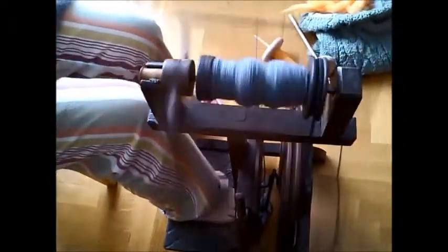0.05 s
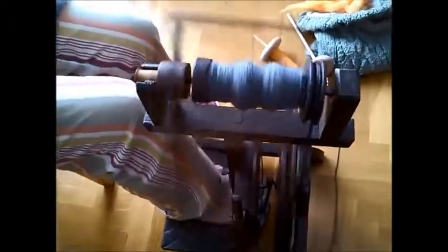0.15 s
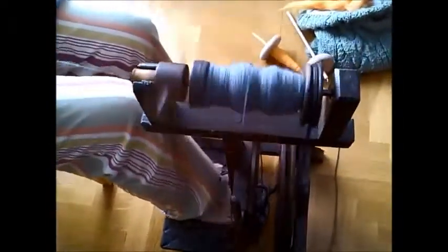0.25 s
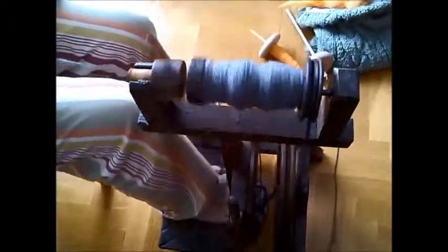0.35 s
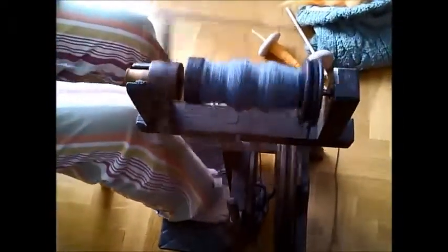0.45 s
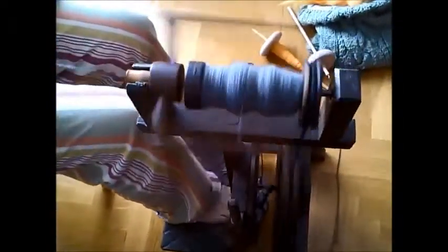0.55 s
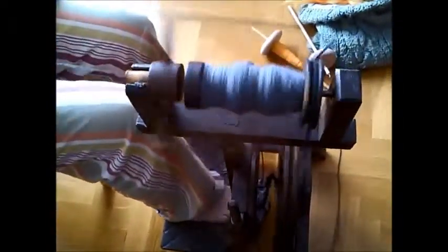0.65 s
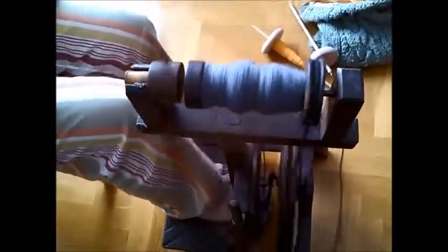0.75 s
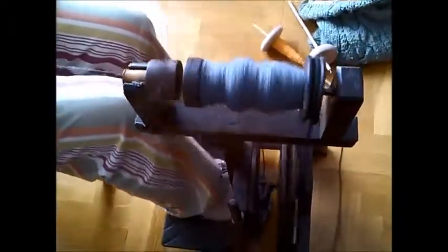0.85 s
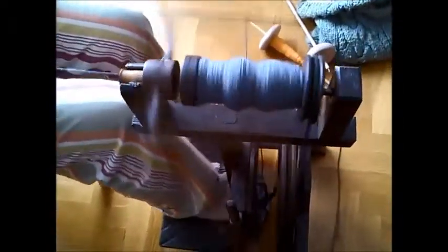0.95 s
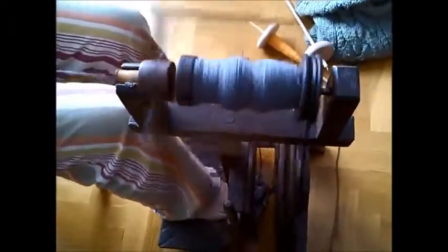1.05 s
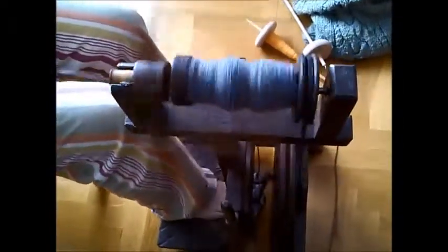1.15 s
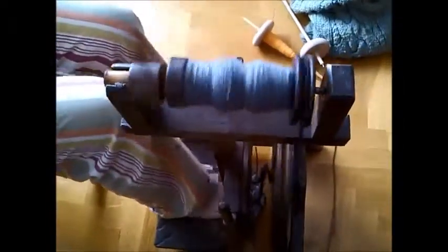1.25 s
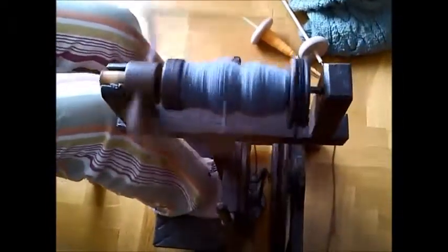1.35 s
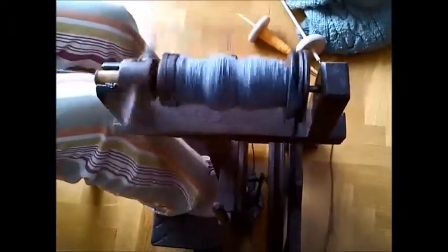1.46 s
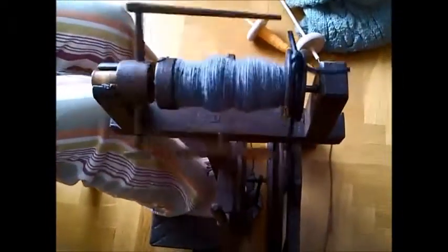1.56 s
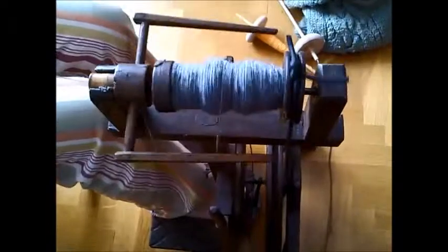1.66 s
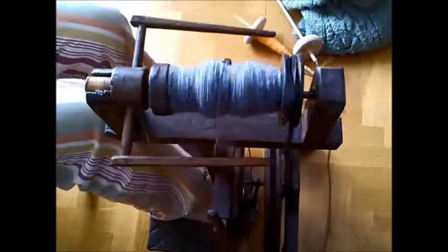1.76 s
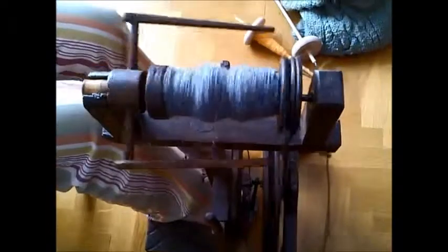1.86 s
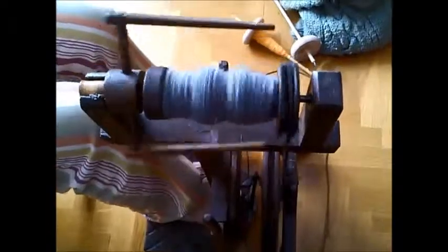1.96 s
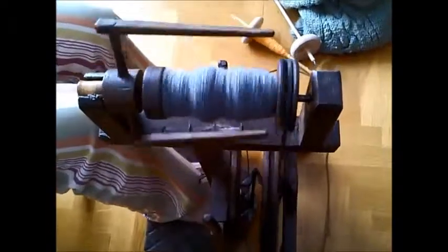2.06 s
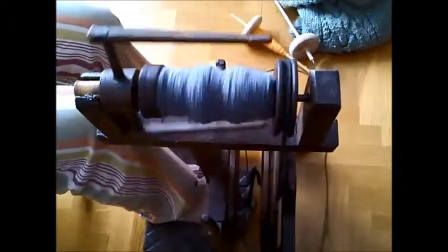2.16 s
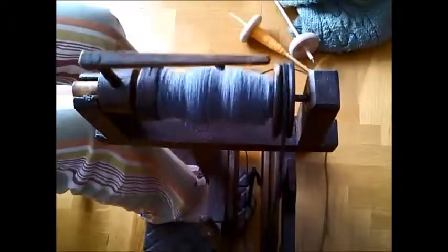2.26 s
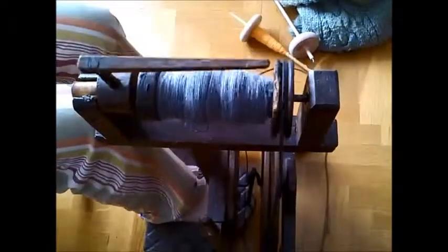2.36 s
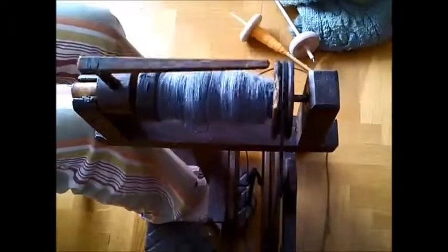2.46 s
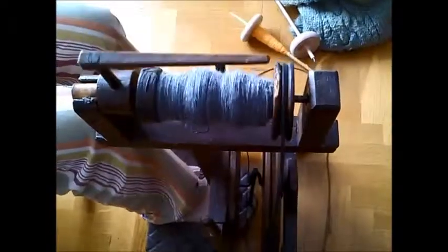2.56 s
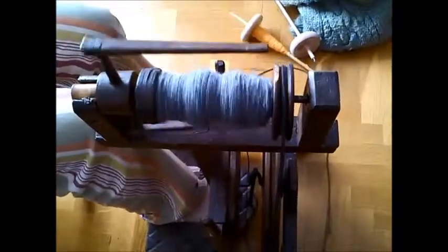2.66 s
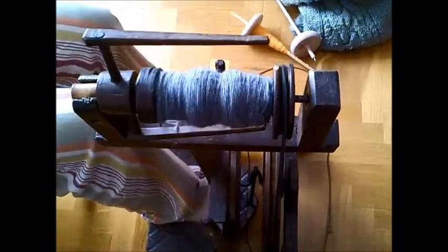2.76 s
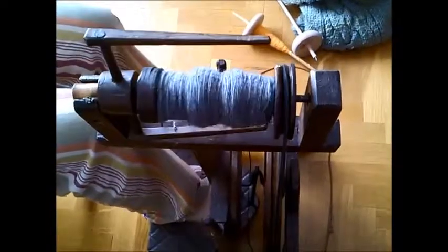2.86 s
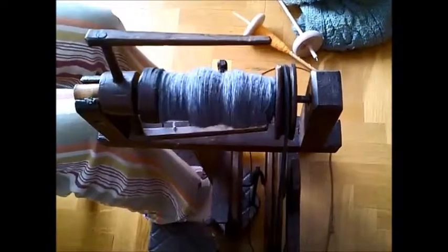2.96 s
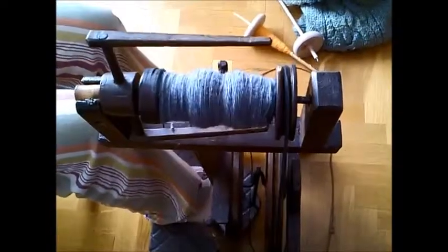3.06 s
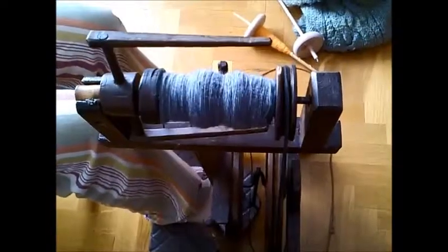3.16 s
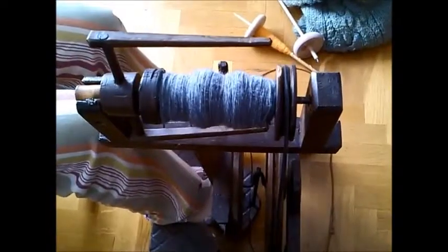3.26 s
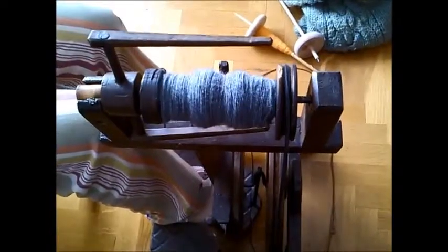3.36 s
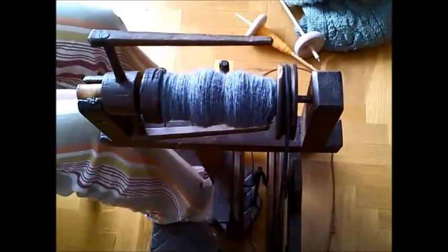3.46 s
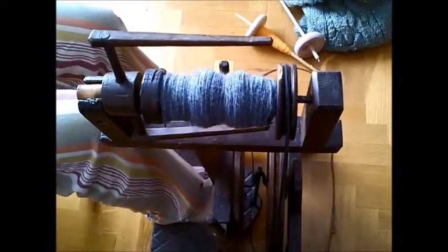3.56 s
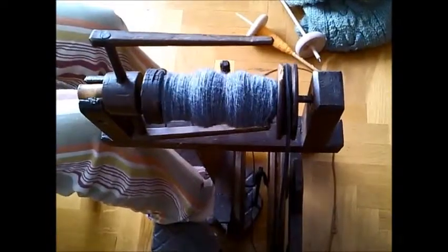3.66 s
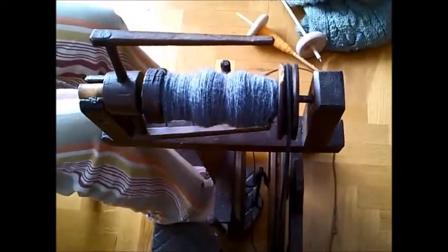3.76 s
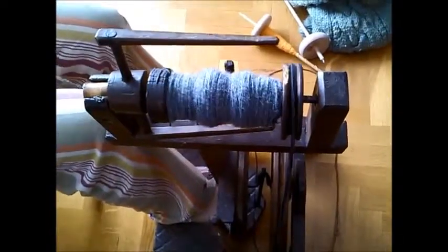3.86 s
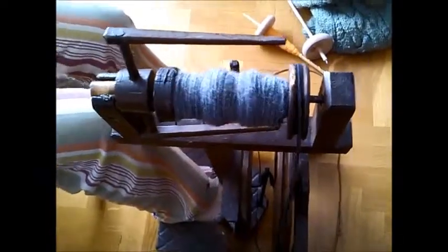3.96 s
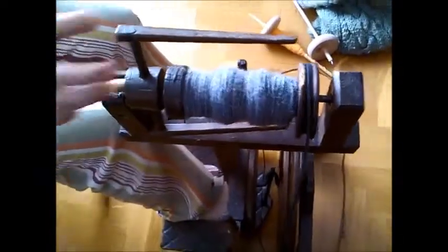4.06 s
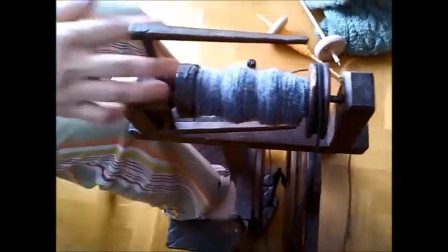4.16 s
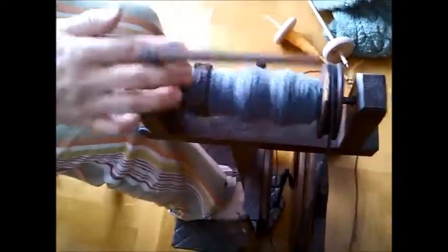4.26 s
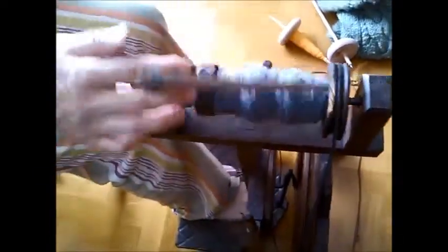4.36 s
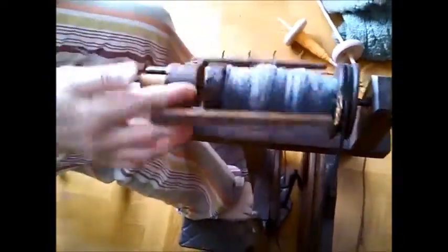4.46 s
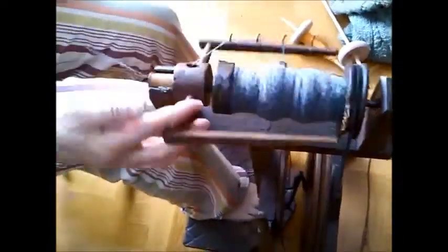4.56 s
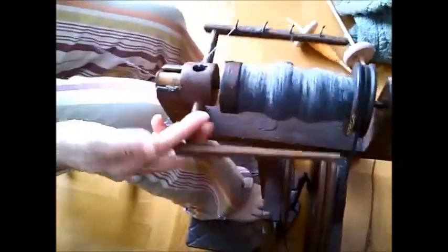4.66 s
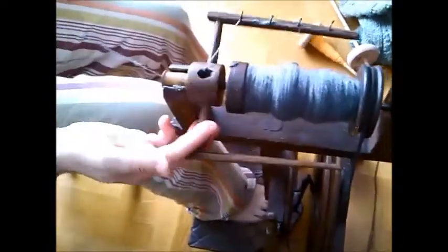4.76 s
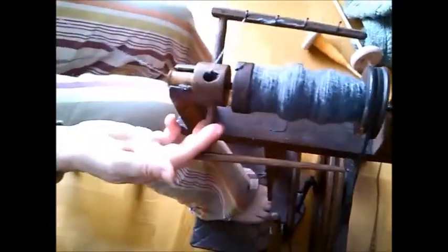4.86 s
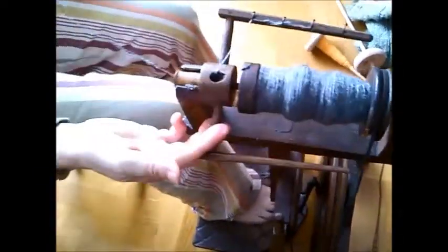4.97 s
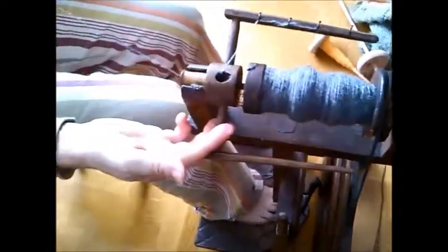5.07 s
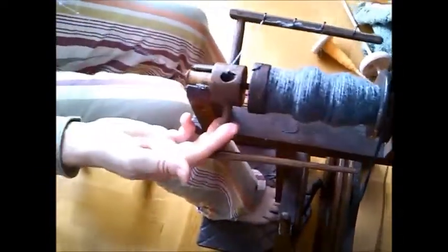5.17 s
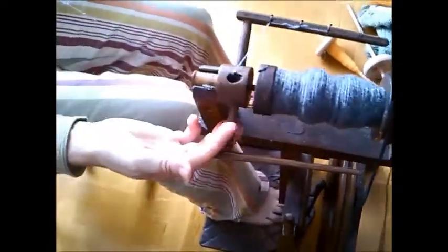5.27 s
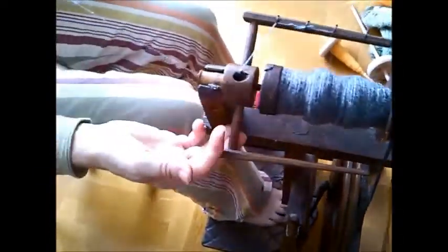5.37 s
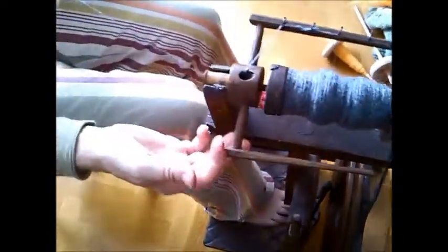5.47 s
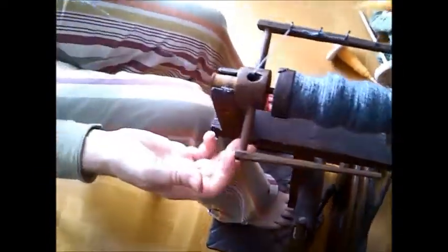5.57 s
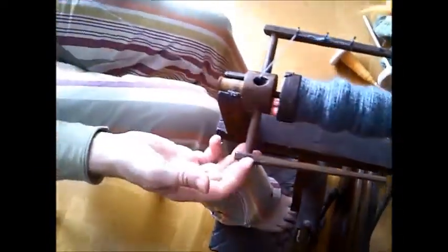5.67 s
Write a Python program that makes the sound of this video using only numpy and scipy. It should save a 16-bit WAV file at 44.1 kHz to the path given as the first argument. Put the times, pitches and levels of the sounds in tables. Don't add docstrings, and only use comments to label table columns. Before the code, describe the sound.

A wooden spinning wheel clatters rapidly over a low pulsing boom, stops with a stuttering brake, swings back briefly, then leaves faint ticks in a quiet room.

```python
import sys
import numpy as np
from scipy import signal
from scipy.fft import rfft, irfft, next_fast_len
from scipy.io import wavfile
from scipy.ndimage import uniform_filter1d, map_coordinates

SR = 44100
rng = np.random.default_rng(int(sys.argv[2]) if len(sys.argv) > 2 else 0)


def generate_wav(signal):
    frames = np.transpose(np.atleast_2d(signal))
    scaled = np.clip(frames, -1, 1) * 32767
    pcm = np.round(scaled).astype(np.int16)
    wavfile.write(sys.argv[1], SR, pcm)


def gain_from_db(level_db):
    decades = np.asarray(level_db, float) / 20
    return 10 ** decades


N = 252673

# (frequency [Hz], density [dB per Hz])
HISS_COLOUR = [(15, -24), (25, -0.5), (35, -9.5), (82, -8), (130, -14), (300, -17), (800, -24.5),
               (1500, -25.5), (2600, -31), (6000, -35.5), (10000, -37.5), (13500, -38.5), (15600, -36),
               (15760, -46), (15800, -120)]
# (frequency [Hz], likeness [0-1])
HISS_ALIKE = [(30, 0.71), (130, 0.7), (640, 0.3), (1400, 0), (15000, 0)]
# (frequency [Hz], likeness [0-1])
WHEEL_ALIKE = [(40, 0.75), (160, 0.99), (700, 0.93), (1400, 0.43), (3000, 0.046), (15000, 0.034)]
# (time [s], level [dB])
EFFORT = [(0, -35.5), (.19, -42.5), (.38, -42), (.53, -41.5), (.69, -38.5), (.97, -41.5), (1.18, -40.5),
          (1.33, -39.5), (1.47, -58.5), (1.55, -88), (1.79, -53.5), (1.93, -45.5), (2.01, -40),
          (2.06, -40.5), (2.2, -42.5), (2.27, -57), (2.8, -97)]
# (frequency [Hz], width [Hz], level [dB])
FRAME = [(189, 50, 15), (232.3, 4.8, 10), (150, 17, -39), (342, 4.1, -20), (293, 8.3, 1.5)]
# (frequency [Hz], density [dB per Hz])
FLOOR = [(20, -32), (50, 23.5), (90, 20), (130, -37), (250, -38)]
# (peak time [s], peak level [dB], length [s], frequency [Hz])
SHUDDERS = [(.04, -32, 0.17, 199.6), (.095, -21, 0.074, 185), (.4, -28, 0.05, 179),
            (.575, -20.5, 0.057, 189), (.63, -18.5, 0.012, 180), (.69, -22.5, 0.08, 198),
            (.79, -17.5, 0.043, 185), (.835, -18, 0.02, 182), (.97, -22, 0.028, 181),
            (1.05, -28, 0.13, 179.7), (1.12, -21, 0.042, 181), (1.225, -21.5, 0.09, 177.4),
            (1.33, -31.5, 0.16, 181.3), (1.45, -37.5, 0.082, 175), (1.81, -33.5, 0.028, 181),
            (1.855, -36.5, 0.038, 183), (2.02, -30, 0.063, 184), (.47, -30, 0.12, 186),
            (1.975, -22.5, 0.03, 189), (2.105, -24, 0.05, 181)]
# (frequency [Hz], width [Hz], level [dB])
LOOSE_PARTS = [(457, 220, -4), (670.4, 20.5, 9.5), (854, 56, 4.5), (1015, 37, 4.5), (1330, 200, -1.5),
               (2100, 960, -11.5)]
# (frequency [Hz], density [dB per Hz])
RUB_COLOUR = [(1500, -9), (2200, 2.5), (3000, 0), (4200, -0.5), (5200, -7), (6500, -11), (9000, -19),
              (12000, -30.5), (15000, -31)]
# (frequency [Hz], width [Hz], level [dB])
HOOKS = [(7200, 2200, 4), (8300, 250, -3), (10500, 86, 2), (10900, 140, -7), (12600, 430, -35),
         (13200, 360, 0)]
# (time [s], length [s], wood [dB], rub [dB], hooks [dB])
SCRAPES = [(0.069, 0.036, -34, -35, -74), (0.568, 0.029, -39, -23.5, -30.5), (0.59, 0.06, -46, -29, -48),
           (0.576, 0.017, -18, -19, -44), (0.738, 0.072, -28, -32, -57), (1.397, 0.13, -42, -47.5, -62),
           (1.958, 0.038, -38, -45, -73), (1.995, 0.022, -41, -35, -47), (2.011, 0.032, -39, -33, -43),
           (2.082, 0.036, -39, -35, -62), (2.109, 0.038, -50, -34.5, -58), (2.138, 0.06, -49, -40, -77),
           (2.146, 0.023, -43, -54, -77), (2.614, 0.082, -49, -54.5, -80)]
# (time [s], peak level [dB], ring [Hz], edge level [dB], edge [Hz])
SHAFT_KNOCKS = [(.0806, -4.5, 1030, -16.5, 3740), (.174, -11, 915, -20, 2260),
                (.2134, -7.5, 1030, -22.5, 4200), (.2841, -11.5, 1350, -15.5, 2740),
                (.345, -6, 1330, -13, 3340), (.3815, -4, 950, -19, 4080), (.4366, -7.5, 1080, -24, 2300),
                (.4873, -8, 925, -18, 4280), (.549, -0.5, 1360, -16.5, 2300), (.608, -6, 950, -20, 2300),
                (.7145, -5, 1070, -14, 3960), (.765, -10.5, 1310, -12, 3720),
                (.8265, -2.5, 1320, -13, 3330), (.8744, -11, 844, -17, 2700),
                (.9112, -12.5, 1050, -16.5, 3400), (.9428, -1.5, 1150, -15.5, 3900),
                (1.026, -7.5, 1090, -11, 3190), (1.049, -7, 955, -15.5, 2240),
                (1.1007, -20, 1030, -12, 2400), (1.1638, -3.5, 1030, -16.5, 4300),
                (1.2513, -8, 1430, -13.5, 3150), (1.2895, -3, 1120, -13, 3350),
                (1.7923, -15.5, 1410, -12, 2650), (1.9832, -12, 1110, -17, 3470),
                (2.0755, -10.5, 1030, -15.5, 3280), (2.0984, -18, 1230, -23, 3820),
                (2.113, -17, 1400, -8.5, 3620), (2.159, -15.5, 880, -26, 3560)]
# (time [s], peak level [dB], ring [Hz], edge level [dB], edge [Hz])
FLANGE_KNOCKS = [(.0153, -8, 1520, -24, 3330), (.0524, -8, 1370, -13, 5420),
                 (.0695, -23.5, 1300, 5.5, 4700), (.0745, -31, 1340, -1, 3720),
                 (.1068, -13.5, 1570, -7.5, 5500), (.1112, -8, 1500, -18.5, 3480),
                 (.2505, -19, 1850, -32, 2220), (.2615, -18.5, 1160, -12.5, 4850),
                 (.3205, -23, 1200, -12, 3000), (.332, -20, 1140, -13, 3840), (.4124, -8, 1530, -22, 3360),
                 (.466, -15, 890, -19, 3350), (.5308, -7, 1480, -24, 3300), (.6438, -5.5, 1510, -24, 3330),
                 (.6636, -10.5, 1560, -18, 3300), (.6838, -15.5, 1860, -16, 4670),
                 (.7385, -10.5, 1290, -16.5, 4000), (.7496, -6, 1450, -25, 4460),
                 (.7953, -8, 845, -20, 3420), (.8556, -13.5, 1450, -21, 3300),
                 (.973, -7.5, 1530, -23, 3340), (.9911, -8.5, 1580, -22, 3370),
                 (1.0848, -6, 1490, -20.5, 3260), (1.1354, -9, 1640, -18.5, 4840),
                 (1.1964, -12, 1460, -22, 3280), (1.216, -22, 1460, -15, 3270),
                 (1.331, -20.5, 1450, -8, 5220), (.7755, -16, 1400, -12, 3700)]
# (time [s], peak level [dB], wood [dB], edge [dB], edge ring [Hz])
TICKS = [(1.717, -34.5, -3, -3.5, 5400), (1.738, -36.5, 2, -20, 3000), (2.231, -34, 4.5, -24, 3530),
         (2.269, -34, -9, -20, 3000), (2.299, -25.5, -6.5, -25, 2850), (2.334, -31.5, -4, -27, 2880),
         (2.443, -35.5, -2, -3.5, 3100), (2.511, -48.5, 10, -36, 3700), (2.6155, -24, -4.5, -31, 3280),
         (2.636, -24, -6, -17.5, 4980), (2.645, -31.5, 3, -28, 3000), (2.671, -36, 0, -20, 3000),
         (2.654, -30, -14, -12.5, 2500), (3.239, -33, -3.5, -15, 4300), (3.494, -33, -7, -14, 4630),
         (3.7188, -31.5, -4, -13.5, 4300), (4.1453, -25.5, -14, -7.5, 4320), (4.267, -45, 4, -1, 3380),
         (4.266, -45.5, 7, 3, 4800), (4.408, -26.5, -7.5, -10, 2920), (4.698, -28, -0.5, -2.5, 4400),
         (4.8, -26.5, -11, -16, 2980), (4.867, -47, 5, -1, 4770)]
# (frequency [Hz], level [dB], time to fall 60 dB [s])
WOOD = [(486, -3.5, 0.037), (621, 1.5, 0.049), (644, -22, 0.053), (820, -11, 0.029), (1030, -4.5, 0.05),
        (1190, -9, 0.04), (1450, 2, 0.028)]
# (frequency [Hz], level [dB], time to fall 60 dB [s])
EDGE = [(2250, -2, .006), (3100, -2, .006), (3900, -1, .006), (4700, -2, .005), (5800, -9, .004),
        (7800, -16, .003)]
# (frequency [Hz], density [dB per Hz])
CRACK_COLOUR = [(1200, -46), (2000, -4.5), (3000, 3), (4600, 3), (6000, -7), (7500, -12.5), (10000, -27)]
# (frequency [Hz], density [dB per Hz])
GLINT_COLOUR = [(5000, -24), (7000, 2.5), (8500, 1.5), (12000, -8), (14000, -14), (15500, -30)]
# (frequency [Hz], time to fall 60 dB [s])
ROOM = [(200, 0.85), (1000, 0.21), (4000, 0.16), (10000, 0.0053)]
# (time [s], peak level [dB], frequency [Hz], time to fall 60 dB [s])
SHIVERS = [(0.072, -28, 3780, .08), (.571, -25, 4930, .08), (.58, -20, 3120, .05), (.583, -20, 4190, .04),
           (1.3, -55, 4260, .15), (1.994, -30.5, 3310, .05), (1.997, -34.5, 4900, 0.18),
           (4.146, -45, 4630, 0.026), (4.15, -53, 4250, 0.23), (4.267, -49, 3370, .04),
           (4.698, -42, 4700, 0.026), (4.703, -49, 4280, 0.3)]
# (time [s], peak level [dB], frequency [Hz])
ARM_RINGS = [(.578, -16.5, 598), (.579, -20.5, 1244), (2.077, -27.5, 937), (2.033, -34, 906),
             (4.628, -42, 194), (4.268, -45.5, 182), (4.407, -46, 1046), (4.802, -47, 1087),
             (2.016, -28, 724), (2.158, -28.5, 708), (2.615, -40.5, 537), (3.24, -51, 610),
             (3.494, -47, 592), (3.719, -47, 564), (4.146, -44.5, 606), (4.268, -44.5, 592),
             (4.406, -44, 1403), (4.408, -45.5, 595), (4.624, -42, 843), (4.699, -48, 1170),
             (4.804, -48, 1410), (4.868, -48, 466)]
# (time [s], level [dB])
SLIPS = [(1.375, -25), (1.388, -23), (1.401, -20.5), (1.4131, -20), (1.4165, -21), (1.429, -18),
         (1.444, -21), (1.4589, -16), (1.472, -23), (1.489, -32), (1.85, -22.5), (1.871, -18),
         (1.887, -20.5), (1.902, -20), (1.917, -22.5), (1.931, -16.5), (1.946, -19), (1.959, -17.5),
         (1.975, -17), (1.991, -23), (2.006, -13.5), (2.02, -24), (2.034, -21), (2.084, -20), (2.101, -23),
         (2.126, -22), (2.141, -18), (2.165, -17), (2.174, -35), (2.19, -28), (2.204, -37)]
# (frequency [Hz], width [Hz], level [dB])
BAND = [(504, 220, -10), (700, 51, 1.5), (1030, 80, -1), (1330, 163, -1), (2280, 400, -14),
        (3000, 260, -12.5), (4620, 680, -13.5)]
# (time [s], peak level [dB], frequency [Hz], tail level [dB])
SNAPS = [
    (4.6211, -26, 1450, -13.5),
    (1.5, -37.5, 9400, -23),
]
# (time [s], peak level [dB], frequency [Hz])
THUMPS = [(1.599, -37, 40), (2.242, -38, 40.4), (2.883, -37.5, 42.2), (4.258, -52, 40.4), (4.16, -38, 40),
          (4.804, -38, 40.9), (5.438, -38, 40.8), (5.699, -45, 40.4)]
# (start [s], end [s], frequency [Hz], level [dB])
SQUEAK = (2.62, 3.2, 5400, -77)
# (frequency [Hz], left minus right [dB])
CAMERA_LEAN = [(200, -1), (2400, .5), (4400, -4.5), (8000, 6), (13000, 16)]
# (from time [s], top frequency [Hz])
TOP_PITCH = [(0, 15000), (.09, 14500), (.14, 15800), (.205, 15000), (.285, 15800), (.325, 14800),
             (.36, 15000), (.555, 14000), (.567, 15300), (.61, 14000), (.67, 15000), (.72, 13500),
             (.75, 15000), (.91, 14000), (.925, 12500), (.94, 15100), (1.01, 14200), (1.03, 12000),
             (1.04, 10500), (1.052, 9300), (1.072, 12000), (1.08, 15000), (1.16, 13000), (1.175, 14500),
             (1.2, 15700), (1.25, 15000), (1.33, 15400), (1.39, 15800), (1.782, 12800), (1.79, 15300),
             (1.87, 15600), (1.93, 14000), (1.945, 12000), (1.96, 11000), (1.975, 13000), (1.99, 15200),
             (2.062, 13200), (2.175, 15300), (2.2, 15800)]
# (from time [s], to time [s])
BUSY_SPELLS = [(0, .14), (.26, .3), (.345, .55), (.72, .87), (.9, .94), (1.01, 1.05), (1.12, 1.3),
               (1.78, 1.79), (1.92, 1.99), (2.13, 2.18)]


def unit(x):
    return x / np.sqrt(np.mean(x ** 2) + 1e-20)


def along(points, hz):
    f, v = np.transpose(points)
    return np.interp(np.log(hz + 1), np.log(f + 1), v)


def wobble(rate):
    knots = rng.standard_normal(int(N * rate / SR) + 4)
    return map_coordinates(knots, [np.arange(N) * rate / SR])


def filtered(x, response):
    m = next_fast_len(N + SR // 2)
    hz = np.fft.rfftfreq(m, 1 / SR)
    return irfft(rfft(x, m) * response(hz), m)[..., :N]


def resonances(modes):
    def response(f):
        total = 0
        for k, (centre, width, db) in enumerate(modes):
            damping = 1j * f * width
            total = total + (-1) ** k * gain_from_db(db) * damping / (centre * centre - f * f + damping)
        return total
    return response


def coloured(response, grain_db=0, alike=WHEEL_ALIKE):
    spikes = gain_from_db(grain_db * np.minimum(rng.exponential(size=N), 5)) if grain_db else 1

    def middle_and_side(hz):
        turn = np.arccos(np.clip(along(alike, hz), -1, 1)) / 2
        return response(hz) * [np.cos(turn), np.sin(turn)]

    mid, side = filtered(spikes * rng.standard_normal((2, N)), middle_and_side)
    return unit(np.array([mid + side, mid - side]))


def fuzz(hz, t, size):
    sway = uniform_filter1d(rng.standard_normal((2, *t.shape)), size=size)
    sway = uniform_filter1d(sway, size=size // 3) * np.sqrt(size)
    return sway[0] * np.sin(2 * np.pi * hz * t) + sway[1] * np.cos(2 * np.pi * hz * t)


def background():
    level_db = -51 + .35 * wobble(3.1)
    return gain_from_db(level_db) * coloured(lambda hz: gain_from_db(along(HISS_COLOUR, hz)), alike=HISS_ALIKE)


def frame_body(hz):
    return np.abs(resonances(FRAME)(hz)) + gain_from_db(along(FLOOR, hz) - 27)


def shudder():
    time = np.arange(3 * SR) / SR
    s, db, length, hz = np.transpose(SHUDDERS)[:, :, None]
    swell = gain_from_db(db - 1.0) * np.exp(-(2 * (time - s) / length) ** 2)
    start = rng.random(s.shape)
    hum = np.sum(swell * np.sin(2 * np.pi * (hz * (time - s) + start)), axis=0)
    return np.pad(hum, (0, N - len(time)))


def turning():
    time = np.arange(N) / SR
    effort_db = np.interp(time, *np.transpose(EFFORT), right=-120)
    rattle_power = gain_from_db(effort_db - 2.0) ** 2
    rub_power = gain_from_db(-48 + effort_db + 43.0) ** 2
    power = np.array([rattle_power, rub_power, np.zeros(N)])
    for start, length, *dbs in SCRAPES:
        u = np.clip((time - start) / length, 0, 4)
        grip = (1 - np.exp(-u * 8)) * np.exp(-u ** 3 * 2.5) * (u < 4)
        power += np.outer(gain_from_db(dbs) ** 2, grip)
    shake = gain_from_db(2.2 * wobble(70) + .7 * wobble(22))
    rattle_gain, rub_gain, hook_gain = shake * np.sqrt(power)
    boom = gain_from_db(-39 + 0.97 * (effort_db + 44.5)) * coloured(frame_body) + shudder()
    rattle = rattle_gain * coloured(resonances(LOOSE_PARTS), grain_db=4.5)
    rub = rub_gain * coloured(lambda hz: gain_from_db(along(RUB_COLOUR, hz)), grain_db=2.5)
    hooks = hook_gain * coloured(lambda hz: resonances(HOOKS)(hz) * (hz > 6000), grain_db=1.5)
    return boom + rattle + rub + hooks


def contacts():
    rows = [(s, db, 1083, wood_db, edge_db, edge_hz) for s, db, wood_db, edge_db, edge_hz in TICKS]
    for table, table_wood_db in [(SHAFT_KNOCKS, -13), (FLANGE_KNOCKS, -26)]:
        for s, db, hz, edge_db, edge_hz in table:
            rows.append((s, db, hz, table_wood_db - (db + 10.5), edge_db, edge_hz))
    return rows


def ring(modes, t, scatter_db):
    hz, db, t60 = np.transpose(modes)[:, :, None, None]
    count = len(modes)
    level = db + scatter_db * rng.standard_normal((count, 1, 1))
    level = level + 1.5 * rng.standard_normal((count, 2, 1))
    phase = hz / 4000 * rng.standard_normal((count, 2, 1))
    tune = 1 + 0.021 * rng.standard_normal((count, 1, 1))
    return np.sum(gain_from_db(level - 60 * t / t60) * np.sin(2 * np.pi * hz * tune * t + phase), axis=0)


def knocks(events):
    out, t = np.zeros((2, N + SR)), np.arange(SR // 14) / SR
    low, high, top, kick = np.zeros((4, N + SR))
    for s, db, main_hz, wood_db, edge_db, edge_hz in events:
        at = round((s + .0005) * SR)
        span = slice(at, at + len(t))
        lag = np.array([[0], [.00008 + .00004 * rng.standard_normal()]])
        u = np.maximum(t - lag, 0)
        rise = 1 - np.exp(-(u / .0003) ** 2)
        soft_db = max(-12 - db, 0)
        blow_t60 = 0.0042 * gain_from_db(1.18 * soft_db)
        blow = -gain_from_db(4 - 1.0 * soft_db - 60 * u / blow_t60) * np.sin(2 * np.pi * main_hz * u)
        wood = -gain_from_db(wood_db - 10.5) * ring(WOOD, u, scatter_db=2.5)
        edge = np.zeros_like(u)
        edge[:, :500] = gain_from_db(edge_db - 3 - .4 * soft_db) * ring(EDGE, u[:, :500], scatter_db=2)
        dying = gain_from_db(-60 * u / 0.015) + gain_from_db(-22 - 60 * u / 0.09)
        shimmer = gain_from_db(edge_db - 2.0) * dying * fuzz(edge_hz, u, size=30)
        out[:, span] += gain_from_db(db) * rise * (blow + wood + edge + shimmer)

        snap = rise[0] * gain_from_db(-60 * t / .006)
        low[span] += gain_from_db(db - 20.5 - 60 * t / 0.062) ** 2
        crack = gain_from_db(4.5) * snap + gain_from_db(-12.0 - 60 * t / 0.057)
        high[span] += gain_from_db(db + edge_db - 0.96 * soft_db) ** 2 * crack ** 2
        glint = snap + gain_from_db(-18 - 60 * t / .04)
        top[span] += gain_from_db(3 * (db + edge_db) + 18) ** 2 * glint ** 2
        kick[at] = gain_from_db(db + 9.0)
    scatter = np.sqrt(low[:N]) * coloured(resonances(LOOSE_PARTS))
    scatter += np.sqrt(high[:N]) * coloured(lambda hz: gain_from_db(along(CRACK_COLOUR, hz)))
    scatter += np.sqrt(top[:N]) * coloured(lambda hz: gain_from_db(along(GLINT_COLOUR, hz)))
    return out[:, :N] + scatter + filtered(kick[:N], resonances(FRAME))


def room(x):
    hz, t, z = signal.stft(coloured(np.ones_like)[:, :SR // 2], SR, nperseg=256)
    dying = gain_from_db(-60 * t / along(ROOM, hz)[:, None])
    tail = signal.istft(z * dying, SR, nperseg=256)[1]
    delayed = np.pad(x, ((0, 0), (120, 0)))
    return signal.fftconvolve(delayed, tail / np.linalg.norm(tail[0]), axes=1)[:, :N]


def shiver():
    out, t = np.zeros((2, N + SR)), np.arange(SR // 6) / SR
    for s, db, hz, t60 in SHIVERS:
        sound = gain_from_db(db - 60 * t / t60) * fuzz(hz, np.array([t, t]), size=54)
        out[:, round(s * SR):][:, :len(t)] += sound
    return out[:, :N]


def arm():
    out, t = np.zeros(N + SR), np.arange(SR // 5) / SR
    for s, db, hz in ARM_RINGS:
        swing = np.sin(2 * np.pi * hz * t) + 0.81 * fuzz(hz, t, size=150)
        out[round(s * SR):][:len(t)] += gain_from_db(db - 60 * t / .085) * swing
    return out[:N]


def chatter():
    jerks = np.zeros(N)
    s, db = np.transpose(SLIPS)
    jerks[np.round(s * SR).astype(int)] = gain_from_db(db + 24.5)
    t = np.arange(SR // 200) / SR
    rough = np.convolve(jerks, gain_from_db(-60 * t / 0.015))[:N] * coloured(np.ones_like)
    return filtered(jerks + gain_from_db(-13.5) * rough, lambda hz: resonances(BAND)(hz) / (1 + 1j * hz / 3500) ** 2)


def snaps():
    out, t = np.zeros((2, N + SR)), np.arange(SR // 10) / SR
    for s, db, hz, tail_db in SNAPS:
        rise = 1 - np.exp(-(5.5 * hz * t) ** 2)
        swing = -gain_from_db(9 - 60 * t * hz / 5) * rise * np.sin(2 * np.pi * hz * t)
        tail = gain_from_db(tail_db - 60 * t / 0.11) * fuzz(hz, np.array([t, t]), size=15)
        out[:, round(s * SR):][:, :len(t)] += gain_from_db(db) * (swing + tail)
    return out[:, :N]


def handling():
    out, t = np.zeros((2, N + SR)), np.arange(SR // 10) / SR
    for s, db, hz in THUMPS:
        push = gain_from_db(db + 15.5 - 60 * t / 0.016) * np.sin(2 * np.pi * hz * t)
        out[:, round(s * SR):][:, :len(t)] += push * gain_from_db(2.9 * rng.standard_normal((2, 1)))
    return out[:, :N]


def squeak():
    start, end, hz, db = SQUEAK
    time = np.arange(N) / SR
    fade = np.clip(np.minimum(time - start, end - time) / 0.034, 0, 1)
    level = gain_from_db(db + 2.5 * wobble(18))
    cycles = np.cumsum(hz + 70 * wobble(150)) / SR
    return fade * level * np.sin(2 * np.pi * cycles)


def scene():
    hits = knocks(contacts()) + chatter() + arm() + shiver() + snaps()
    wheel = hits + gain_from_db(-13) * room(hits) + turning() + squeak()

    def camera_body(hz):
        sides = np.array([[.5], [-.5]])
        return gain_from_db(along(CAMERA_LEAN, hz) * sides) / (1 + (hz / 15400) ** 30)

    return filtered(wheel, camera_body) + handling() + background()


def thinned(x):
    hz, t, z = signal.stft(x, SR, nperseg=512)
    pitch = hz[:, None]
    start, top_hz = np.transpose(TOP_PITCH)
    field = uniform_filter1d(rng.standard_normal(z.shape[1:]), size=8, axis=0)
    field = unit(uniform_filter1d(field, size=3, axis=1))
    busy = sum((t > a) * (t < b) for a, b in BUSY_SPELLS)
    lost = pitch > top_hz[np.searchsorted(start, t, side="right") - 1]
    rarity = 1.05 + (14000 - pitch) / 14000
    lost |= (field > rarity) * (pitch > 5600) * (busy > 0)
    return signal.istft(z * ~lost, SR, nperseg=512)[1][:, :N]


def band_limit(x):
    return signal.sosfilt(signal.butter(12, 15720, fs=SR, output="sos"), x)


def record(dry):
    rounded = dry / (1 + np.abs(dry / .9) ** 4) ** (1 / 4)
    mix = thinned(rounded) + .044
    return band_limit(mix)


dry = scene()
out = record(dry)
generate_wav(out)
```